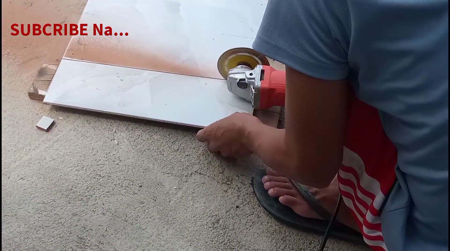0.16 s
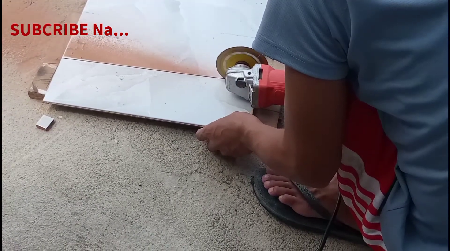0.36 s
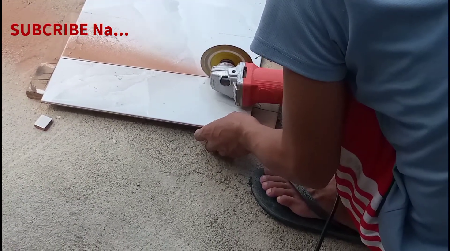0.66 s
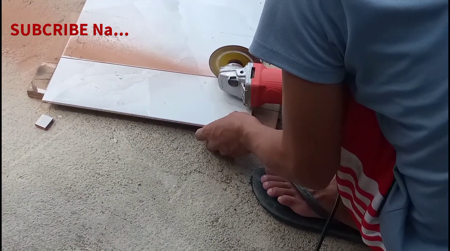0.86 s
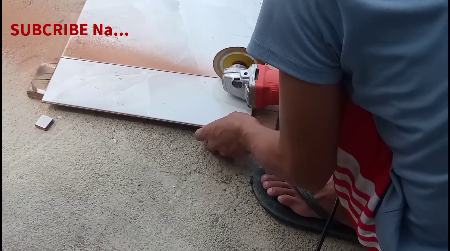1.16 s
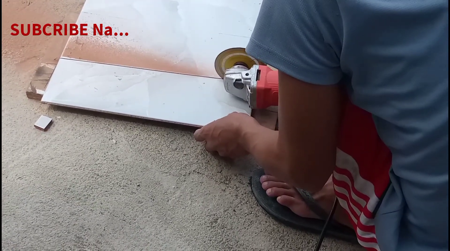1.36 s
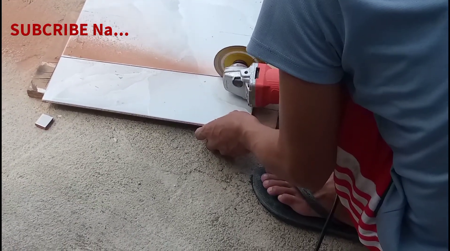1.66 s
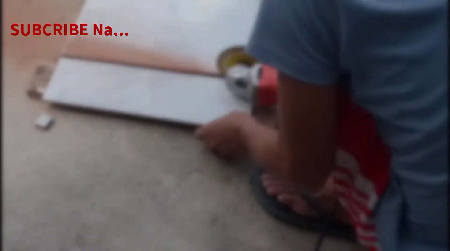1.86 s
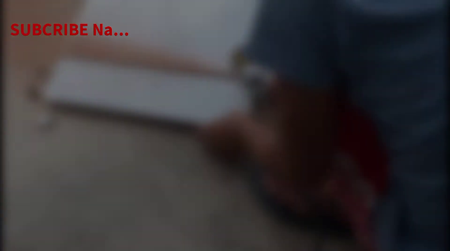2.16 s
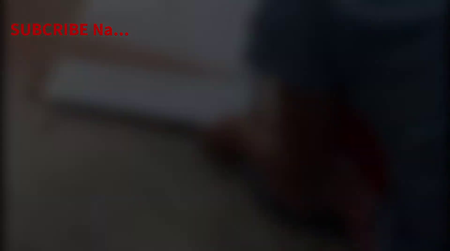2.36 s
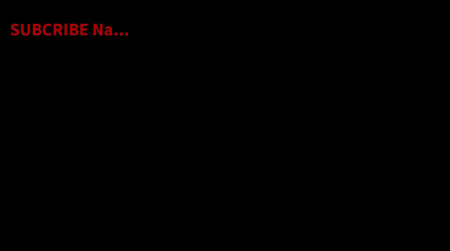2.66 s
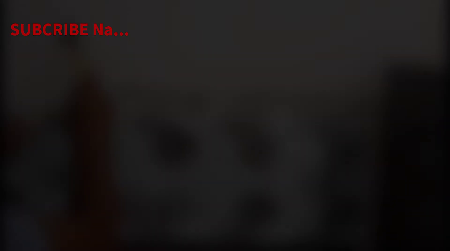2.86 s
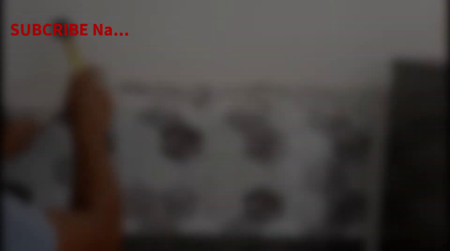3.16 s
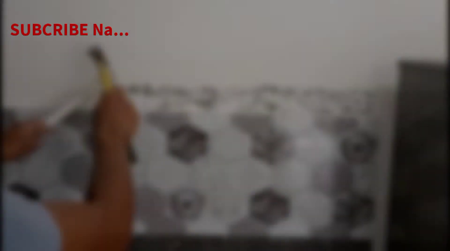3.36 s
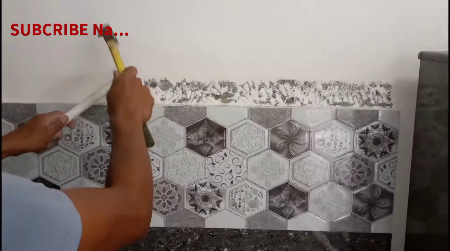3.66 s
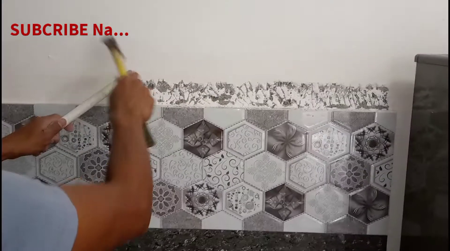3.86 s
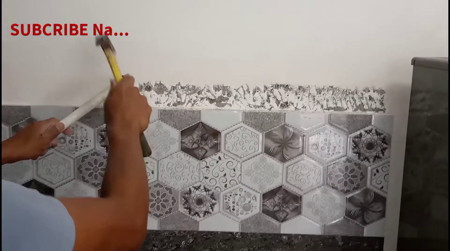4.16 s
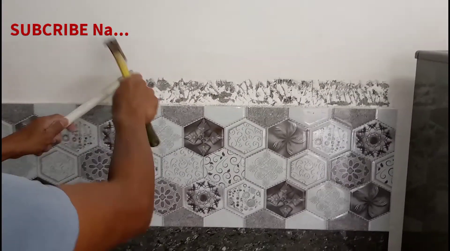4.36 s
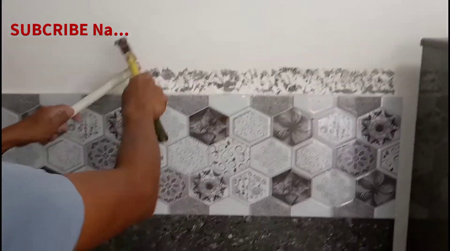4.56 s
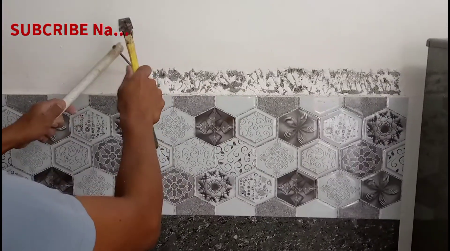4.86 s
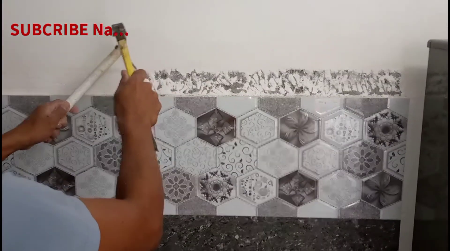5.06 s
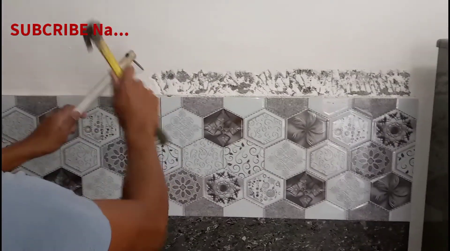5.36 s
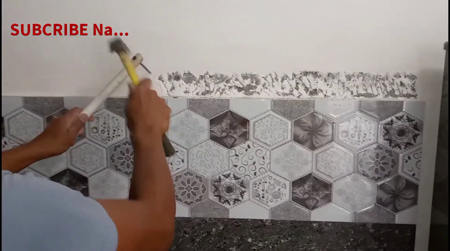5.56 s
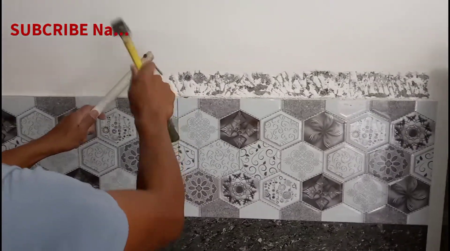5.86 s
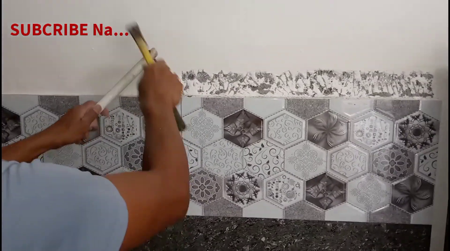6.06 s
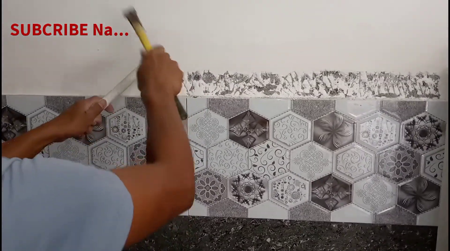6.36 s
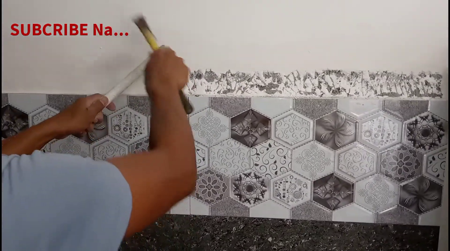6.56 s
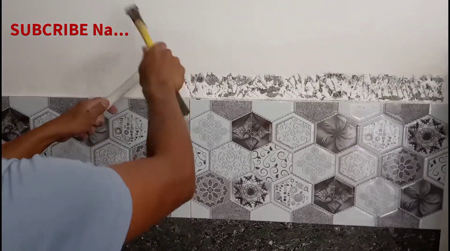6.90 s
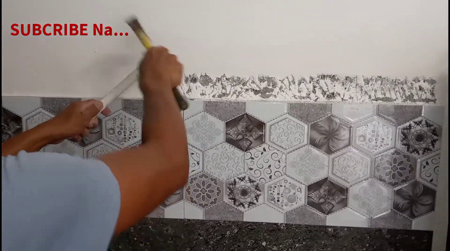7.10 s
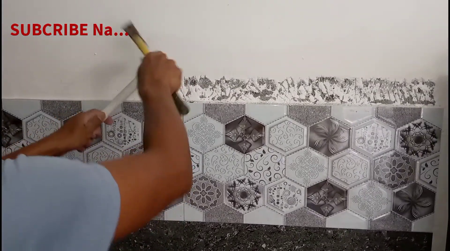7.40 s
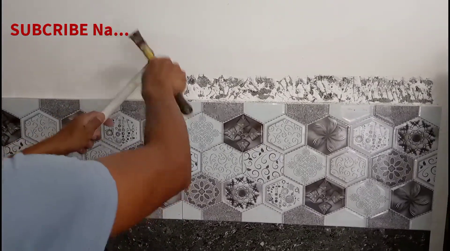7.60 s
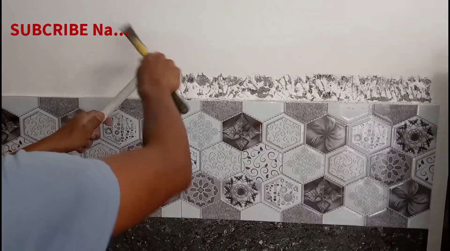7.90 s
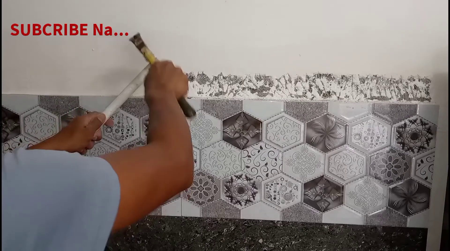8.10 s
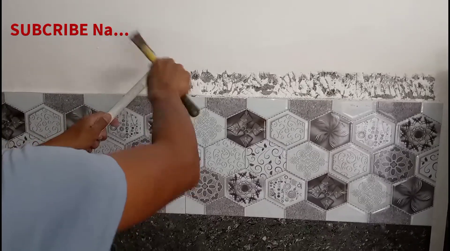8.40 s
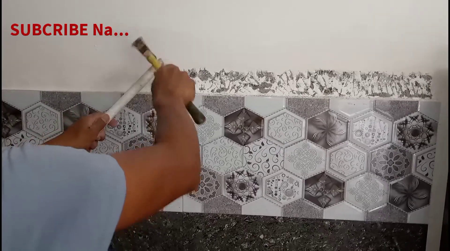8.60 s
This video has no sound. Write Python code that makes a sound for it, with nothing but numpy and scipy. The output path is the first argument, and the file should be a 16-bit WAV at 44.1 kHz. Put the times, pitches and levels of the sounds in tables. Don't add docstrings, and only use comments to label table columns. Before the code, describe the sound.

From 0 to about 2.7 s, a close angle grinder cuts ceramic tile: a steady, harsh, gritty hiss, peaky around 4 kHz, throbbing rapidly with the disc's turns. High disc resonances ring through it, with fuzzy whistles in the first 0.8 s and again near 0.9, 1.1 and 1.9 s. A thin motor whine lifts in pitch toward the end; a brief squeal at 2.2 s and dull tile bumps around 1.9, 2.2 and 2.6 s. It stops abruptly, leaving 0.1 s of silence. A faint room then fades in with a fading earlier blow. Hammer on steel chisel in plaster cracks six times from 3.45 to 4.7 s, about every quarter second. Small chips clink around 5.0-5.6 s. Twelve more blows run evenly from 5.6 to 8.5 s, bright, slightly varied, with low wall thud, steel ring and a roughly half-second hard room tail.

```python
import sys
import numpy as np
from scipy import signal
from scipy.io import wavfile
from scipy.ndimage import uniform_filter1d

SR = 44100
rng = np.random.default_rng(int(sys.argv[2]) if len(sys.argv) > 2 else 0)


def wav_record(signal):
    frames = np.transpose(np.atleast_2d(signal))
    bounded = np.clip(frames, -1, 1)
    quanta = np.round(bounded * 32767).astype(np.int16)
    wavfile.write(sys.argv[1], SR, quanta)


def to_linear_factor(level_db):
    exponent = np.asarray(level_db, float) / 20
    return 10 ** exponent


N = 385434
T = np.arange(N) / SR

# (time [s], crack peak [dB], wall thud [dB], room [dB], steel brightness [dB])
BLOWS = [(3.449, -12.5, -3, 10.5, -0.5), (3.695, -11.5, 4.5, 4, 7), (3.9308, -10.5, -1.5, 6.5, 4.5),
         (4.199, -14, 7.5, 8, 9.5), (4.4528, -13.5, 4, 7, 3.5), (4.701, -10.5, -2.5, 8.5, 3.5),
         (5.6175, -8, -7.5, 9.5, 2.5), (5.884, -9.5, 4.5, 7.5, 3.5), (6.145, -8, 5, 9, -1),
         (6.4081, -13, 10.5, 8, -2), (6.658, -11.5, 0.5, 9.5, -1.5), (6.917, -12, 1, 10.5, 4.5),
         (7.1912, -12, -1.5, 10, -4.5), (7.447, -10, 1.9, 7.5, 7), (7.71, -9, -7, 8.5, -0.5),
         (7.962, -14, -2, 12, 4.5), (8.23, -12.5, -4.5, 10, 6), (8.49, -10.5, -6, 12, -0.5)]


def grinder():
    # (time [s], commutator whine, ten times the shaft [Hz], whine level [dB])
    speed = [(0, 1152, -46.5), (.2, 1155, -45), (.43, 1162, -42), (.65, 1188, -45.5), (.8, 1240, -55),
             (.92, 1267, -38), (1.02, 1262, -42.5), (1.12, 1230, -53), (1.3, 1217, -48.5),
             (1.6, 1225, -53.5), (1.9, 1253, -51.5), (1.99, 1269, -35.5), (2.15, 1272, -49),
             (2.3, 1301, -38.5), (2.38, 1329, -33), (2.46, 1346, -40.5), (2.6, 1382, -49.5),
             (2.68, 1401, -31)]
    # (start [s], end [s], pitch [Hz], level [dB])
    songs = [(0.064, .42, 4130, -20), (0, 0.41, 5030, -26), (0.444, .78, 8400, -46),
             (0.879, 1.006, 4380, -25), (1.112, 1.168, 5000, -21), (1.876, 1.982, 5260, -28),
             (2.22, 2.405, 2740, -44)]
    # (time [s], peak [dB], top frequency [Hz])
    knocks = [
        (1.881, -31, 400),
        (2.207, -24.5, 503),
        (2.559, -36.5, 402),
        (2.594, -22.5, 900),
    ]
    stop_s = 2.685
    t = T[:round(stop_s * SR)]
    whine_hz, whine_db = columns(speed, t)
    out = scratch(t, whine_hz) + motor(t, whine_hz, whine_db)
    for row in songs:
        add(out, row[0], sing(*row))
    add(out, 2.172, squeal(2.214 - 2.172))
    for s, db, top_hz in knocks:
        add(out, s, bump(db, top_hz))
    out[-350:] *= np.hanning(700)[350:]
    return np.pad(out, (0, N - len(out)))


def scratch(t, whine_hz):
    # (time [s], grit level [dB])
    feed = [(0, -16.5), (.4, -17), (.64, -18), (.9, -16.5), (1.2, -17.5), (1.55, -16.5), (1.92, -16),
            (1.97, -18.5), (2.16, -15.5), (2.22, -20), (2.27, -17), (2.36, -20), (2.5, -18.5), (2.62, -21),
            (2.68, -16.5)]
    # (frequency [Hz], density [dB per Hz])
    grit_colour = [(40, -47), (300, -41.5), (560, -29), (900, -24.5), (1730, -23), (2500, -11.5),
                   (3600, -3.5), (4700, -4), (5800, -19.5), (7100, -15.5), (8100, -38.5), (9300, -35),
                   (12700, -31), (15300, -18.5)]
    # (frequency [Hz], width [Hz], level over the grit [dB])
    blade_modes = [(2573, 295, 3.5), (2880, 22, -4), (4227, 90, -6), (4570, 30, -2.5), (5000, 21, -11),
                   (5260, 20, -5), (5760, 45, 7.5), (6500, 200, 0.5), (7250, 470, 1.5),
                   (7770, 70, 6), (8400, 130, 8), (9640, 80, 15), (10300, 60, 6), (10700, 60, 6),
                 (11000, 50, 6), (11300, 110, 10), (11850, 60, 15), (13100, 50, 4), (13500, 60, 10),
                 (14300, 90, 6)]
    repeat, runout = .3, .18
    body_follows, dust_follows = .3, .4
    body_ends_db, deepest_s, dust_db_per_s = 2.5, 1.45, -.8

    turns = np.cumsum(whine_hz / 10) / SR
    fresh = rng.standard_normal(len(t))
    grit = np.sqrt(1 - repeat) * fresh + np.sqrt(repeat) * rim_pattern(turns)
    wobble = 1 + runout * np.cos(2 * np.pi * turns)
    grit *= to_linear_factor(1.55 * drift(len(t), [70])) * wobble

    rings = 0
    for hz, width, db in blade_modes:
        wandering_hz = hz * (1 + .002 * drift(len(t), [6000]))
        ring = evened(resonate(resonate(grit, hz, 8 * width), wandering_hz, width))
        level_db = read(grit_colour, hz) + db + 0.92 * drift(len(t), [5000])
        rings = rings + ring * np.sqrt(width) * to_linear_factor(level_db)

    def pressure_colour(hz, s):
        ease = -17 - columns(feed, s)[0]
        body = (1 - body_follows) * ease + body_ends_db * ((s / deepest_s - 1) ** 2 - .33)
        dust = (1 - dust_follows) * ease + dust_db_per_s * (s - deepest_s)
        tilt = body * (1 - step(hz, 1900)) + dust * step(hz, 8000)
        return tilt + 0.77 * drift((len(hz), len(s)), [5, 25])

    wide = shaped(grit, lambda hz, s: read(grit_colour, hz) + 0 * s)
    both = shaped(wide + rings / np.sqrt(np.pi * SR / 4), pressure_colour)
    return evened(both) * to_linear_factor(columns(feed, t)[0] + 1.64)


def rim_pattern(turns):
    pattern = drift((int(turns[-1]) + 2, 360), [12])
    return pattern[turns.astype(int), (turns % 1 * 360).astype(int)]


def sing(start, end, hz, db):
    u = np.arange(start, end, 1 / SR)
    whistle = evened(resonate(rng.standard_normal(len(u)), hz, 25))
    return to_linear_factor(db) * whistle * signal.windows.tukey(len(u), .5)


def squeal(length_s):
    # (frequency [Hz], level [dB])
    locked_modes = [(1986, -33), (2595, -21), (2756, -21), (3047, -21), (3499, -17.5), (3957, -33.5),
                    (4118, -17.5), (4877, -40), (5276, -30), (5647, -31), (6255, -25.5), (7004, -27.5)]
    u = np.arange(0, length_s, 1 / SR)
    tones = sum(to_linear_factor(db + 2.0) * np.cos(2 * np.pi * (hz * u + rng.random())) for hz, db in locked_modes)
    return tones * signal.windows.tukey(len(u), .3)


def bump(db, top_hz):
    u = np.arange(2000) / SR
    rub = np.exp(-u / .006) * rng.standard_normal(len(u))
    shove = 3.3 * np.exp(-u / 0.0012)
    push = signal.lfilter(*signal.butter(2, [60, top_hz], "band", fs=SR), rub + shove)
    return to_linear_factor(db) * push / abs(push).max()


def motor(t, whine_hz, whine_db):
    # (start [s], end [s], from pitch [Hz], to pitch [Hz], level [dB])
    gear_spells = [
        (-.1, 0.487, 802, 770, -39),
        (.9, 1.42, 746, 720, -46),
        (1.42, 1.75, 734, 734, -40),
        (1.853, 1.998, 753, 753, -41.5),
    ]
    # (time [s], hum pitch [Hz], level [dB])
    fan_hum = [(0, 399, -51), (.6, 426.4, -60.5), (1.2, 440, -63), (2, 459.5, -58.5), (2.28, 479, -53),
               (2.4, 512, -52.5), (2.68, 535, -48.5)]
    # (frequency [Hz], width [Hz], swell [dB])
    third_peaks = [(3545, 89, 3.5), (3710, 81, 2), (4086, 50, 5.5), (4197, 32, 11)]
    # (start [s], end [s], level [dB])
    fan_whistles = [
        (.75, 1.097, -42.5),
        (1.68, 1.89, -31),
        (2.08, 2.37, -42),
    ]
    third_db = -28 + 3 * drift(len(t), [4000])
    third_db += sum(db * np.exp(-((3 * whine_hz - hz) / w) ** 2) for hz, w, db in third_peaks)
    lines = tone(whine_hz, whine_db, 0.29) + tone(3 * whine_hz, third_db, 1.0)
    lines += tone(*columns(fan_hum, t), 0.85)
    for start, end, from_hz, to_hz, db in gear_spells:
        gear_hz = np.interp(t, [start, end], [from_hz, to_hz])
        lines += spell(t, start, end) * tone(gear_hz, db, .9)
    gusts = to_linear_factor(-62.5) + sum(to_linear_factor(db) * spell(t, start, end) for start, end, db in fan_whistles)
    return lines + gusts * tone(11.8 * whine_hz, 0, .4)


def tone(hz, db, width):
    waver = 1 + min(width, .35) * drift(len(hz), [700])
    return np.sqrt(2) * to_linear_factor(db) * waver * np.cos(2 * np.pi * np.cumsum(hz) / SR)


def spell(t, start, end):
    return np.sin(np.pi * np.clip((t - start) / (end - start), 0, 1)) ** 1.6


def hammering():
    # (first blow [s], shank at 5.7 kHz [dB], thin ring [dB], hammer head [Hz], head drift [Hz per s])
    grips = [
        (3.449, -0.5, -26, 11200, 500),
        (5.617, -4, -32.5, 11430, -250),
    ]
    # (time [s], extra shank at 5.7 kHz [dB], extra head [dB], extra thin ring [dB], head pitch factor [1])
    askew = [(3.449, 3, 1, -2, 1.04), (3.6951, -2, -1, 3, 1.02), (3.9307, 0.5, -4.5, -18, 0.93),
             (4.701, 0, -1.5, -0.5, 1), (6.145, 1, 2, 3, 0.96), (6.4067, -4, 3.5, 1, 0.89),
             (6.658, -3, 1, 5.5, 0.9), (6.917, 1.5, 2.5, 4.5, 0.94), (7.1909, 6.5, 0.5, -7, 0.96),
             (7.447, -7, -4.5, -2, 0.93), (7.71, -8, -1.5, 13, 0.94), (7.962, -6, -5, 0.5, 0.96),
             (8.23, -3, -3, 4, 0.91), (8.49, 2, -1.5, 3, 0.98)]
    earlier_blow = 2.62, -17, [0.5, -16, 9.5, 3, 5, 13]
    square_db = -10.5
    out = np.zeros(N)
    for s, db, thud, wet, bright in BLOWS:
        first, shank, ring, head_hz, drift_hz = grips[int(s > grips[1][0] - .1)]
        usual = (s, 0, 0, 0, 1)
        _, more_shank, more_head, more_ring, pitch = next((row for row in askew if abs(row[0] - s) < .05), usual)
        glance = square_db - db
        knock = 0.38 * thud
        shank_db = shank + more_shank + 0.28 * bright
        head_db = 4.5 + more_head + 0.59 * glance
        tip_db = -2 + 0.99 * bright
        ring_db = ring + more_ring + 2.3 * glance
        head_hz = pitch * (head_hz + drift_hz * (s - first))
        colours = [thud, knock, shank_db, bright, head_db, tip_db]
        add(out, s, to_linear_factor(db) * strike(colours, wet, ring_db, 0.19, head_hz=head_hz))
    s, db, colours = earlier_blow
    add(out, s, to_linear_factor(db) * strike(colours, 11.0, -58, .45))
    return out


def chips():
    # (time [s], peak [dB], pitch [Hz], clank [dB], air [dB])
    landings = [(3.0265, -40, 4030, -6, -9), (4.171, -27, 4250, -6, -7), (5.008, -35, 4430, -3, 1),
                (5.043, -32.5, 4460, -6, -6), (5.057, -32.5, 2770, -3, -4), (5.085, -36, 4150, -8, -14),
                (5.111, -52, 4000, -5, -15), (5.457, -52, 4000, -17, -19), (5.57, -45, 4230, -8, -19),
                (8.033, -23, 4530, 13, 11), (8.05, -18, 4600, -16, -2), (8.374, -28, 3160, -1, 2),
                (8.4645, -16.5, 3970, -10, -17)]
    out = np.zeros(N)
    for s, db, hz, clank, air in landings:
        colours = [-12, -5, clank, clank, air, air]
        add(out, s, to_linear_factor(db) * strike(colours, 6.3, -60, 0.27, hz / 1.01, 4.3))
    return out


def strike(colours, wet_db, ring_db, echo, hz=3800, focus_db=0.94, head_hz=11300):
    # (frequency [Hz], level [dB], 60 dB decay [s])
    chisel_modes = [(5670, -12, 0.28), (6100, -15, 0.31), (5160, -35, 0.21), (6650, -1.5, 0.089),
                    (6700, -13, 0.097)]
    # (frequency [Hz], level [dB], 60 dB decay [s])
    wall_modes = [(76.6, 4.5, 0.29), (105.7, 2.5, 0.3), (169.4, -3, 0.7), (195.7, -3.5, 0.58),
                  (239, -2, 0.33), (294, 7, 0.16), (329.7, 11, 0.23), (444.3, 3.5, 0.34), (623, 4, 0.39),
                  (924, 4, 0.3)]
    t = np.arange(SR) / SR
    click = coloured_click(colours, hz, focus_db, head_hz)

    burst = rng.standard_normal(400) * np.exp(-t[:400] / 0.014) * (1 - np.exp(-t[:400] / 0.000067))
    burst /= np.linalg.norm(burst)
    burst[50] += .55
    echoes = np.zeros(1200)
    echoes[rng.integers(120, 1200, 6)] = echo * rng.uniform(-0.56, 1, 6)
    echoes[0] = 1
    crack = signal.fftconvolve(click, np.convolve(burst, echoes))[:len(t)]

    flash = crack + 0.98 * resonate(crack, 0.894 * hz, 435) + 1.95 * resonate(crack, 1.078 * hz, 450)
    flash += 1.1 * np.exp(-t / 0.0016) * resonate(crack, 11400, 4400)
    thin_ring = modes([(7504, 1.65 * ring_db + 4.0, 0.36)], t, 0)
    steel = to_linear_factor(colours[2] - 33) * modes(chisel_modes, t, 1.1) + thin_ring
    swell = np.exp(-t / 0.36) * (1 - np.exp(-t / 0.041))
    boom = to_linear_factor(colours[0] + wet_db - 44.5) * swell * modes(wall_modes, t, 2.3)
    return to_linear_factor(7.5) * (flash + room(click + 0.58 * steel, wet_db) + steel + boom)


def coloured_click(colours, hz, focus_db, head_hz):
    # (frequency [Hz], density [dB per Hz])
    crack_colour = [(40, -46), (65, -8), (350, -4.5), (1200, -9), (2400, -2.5), (3600, 2), (4500, -0.5),
                    (5100, -8.5), (5500, 4.5), (7300, -5.5), (8300, -19.5), (11300, -19.5), (13600, -17),
                    (14800, -6.5)]
    # (low edge [Hz], high edge [Hz])
    zones = [(130, 560), (700, 1800), (5250, 6150), (6150, 7700), (8500, 13600), (13600, 30000)]
    f = np.fft.rfftfreq(SR, 1 / SR)
    db = read(crack_colour, f) + focus_db * np.exp(-(np.log((f + 1) / hz) / 0.12) ** 2)
    for colour, (low, high) in zip(colours, zones):
        db += colour * (step(f, low - 1, share=0.021) - step(f, high, share=0.065))
    db += 10 * np.exp(-(np.log((f + 1) / head_hz) / .085) ** 2)
    db += 1.1 * drift(len(f), [350])
    full = np.log(to_linear_factor(np.r_[db, db[-2:0:-1]]))
    click = np.fft.ifft(np.exp(full - 1j * signal.hilbert(full).imag)).real
    return click / np.linalg.norm(signal.lfilter(*signal.butter(2, [1800, 5000], "band", fs=SR), click))


def modes(table, t, spread):
    total = 0
    for hz, db, t60 in table:
        decay = to_linear_factor(db + spread * rng.standard_normal() - 60 * t / t60)
        detune = rng.uniform(1 - spread / 150, 1 + spread / 150)
        total = total + decay * np.sin(2 * np.pi * hz * detune * t)
    return total


def room(x, wet_db):
    # (frequency [Hz], 60 dB decay [s])
    decay_times = [(60, 0.66), (160, 0.66), (420, 0.63), (1100, 0.58), (2900, 0.54), (4900, 0.49),
                   (5800, 0.48), (7000, 0.43), (9000, 0.41), (15000, 0.33)]
    taps = shaped(rng.standard_normal(len(x)), lambda hz, s: -60 * s / read(decay_times, hz), size=256)
    taps *= 1 - np.exp(-np.arange(len(x)) / (0.0037 * SR))
    return signal.fftconvolve(x, taps * to_linear_factor(wet_db) / np.linalg.norm(taps))[:len(x)]


def hush():
    # (frequency [Hz], density [dB per Hz])
    air_colour = [(40, -24), (60, -32), (200, -17), (440, -13.5), (1000, -9), (2600, -6), (4400, -12),
                  (5000, -24), (6400, -25), (7000, -40), (16500, -54)]

    def shifting(hz, s):
        return read(air_colour, hz) + 1.4 * drift((len(hz), len(s)), [8, 12])

    return to_linear_factor(-58) * evened(shaped(rng.standard_normal(N), shifting, size=1024))


def evened(x):
    return x / np.sqrt(np.mean(x ** 2) + 1e-20)


def read(points, hz):
    f, value = np.transpose(points)
    return np.interp(np.log(hz + 1), np.log(f + 1), value)


def columns(rows, t):
    s, *values = np.transpose(rows)
    return [np.interp(t, s, v) for v in values]


def add(mix, s, sound):
    part = mix[round(s * SR):][:len(sound)]
    part += sound[:len(part)]


def resonate(x, hz, width):
    turn = np.exp(2j * np.pi * np.cumsum(hz * np.ones(len(x))) / SR)
    r = np.exp(-np.pi * width / SR)
    return 2 * (turn * signal.lfilter([1 - r], [1, -r], x / turn + 1e-18)).real


def shaped(x, db_of, size=512):
    overlap = 3 * size // 4
    hz, t, z = signal.stft(x, SR, nperseg=size, noverlap=overlap)
    z = z * to_linear_factor(db_of(hz[:, None], t))
    return signal.istft(z, SR, nperseg=size, noverlap=overlap)[1][:len(x)]


def step(hz, at_hz, share=0.048):
    return .5 + .5 * np.tanh((hz - at_hz) / (share * at_hz))


def drift(shape, spans):
    field = rng.standard_normal(shape)
    for axis, span in enumerate(spans):
        field = uniform_filter1d(field, span, axis=axis)
    return evened(field)


def band_limit(x, hz):
    return signal.oaconvolve(x, signal.firwin(1201, hz, window=("kaiser", 8), fs=SR)[None], "same")


def scene():
    start_s, fade_db, fade_s = 2.785, -12, 0.21
    wall_work = (hammering() + chips() + hush()) * np.clip((T - start_s) / .008, 0, 1)
    wall_work *= to_linear_factor(fade_db * np.clip(1 - (T - start_s) / fade_s, 0, 1))
    return np.tile(grinder() + wall_work, (2, 1))


def roll_off(x):
    return signal.sosfilt(signal.butter(12, 16720, fs=SR, output="sos"), x)


def record(dry):
    dry = 1.3 * np.tanh(signal.lfilter(*signal.butter(3, 55, "high", fs=SR), dry) / 1.3)
    low = band_limit(dry, 15520)
    attacks = sum(np.exp(-abs(T - row[0] - .003) / .004) for row in BLOWS)
    leak = band_limit(attacks * (dry - low), 16500)
    return roll_off(low + 0.14 * leak)


dry = scene()
out = record(dry)
wav_record(out)
```